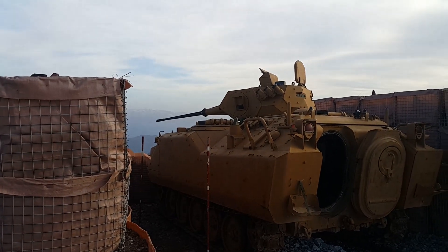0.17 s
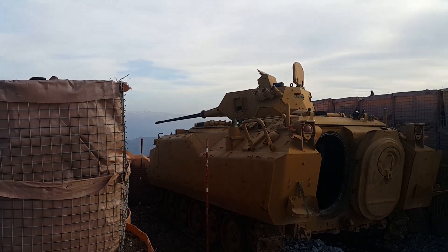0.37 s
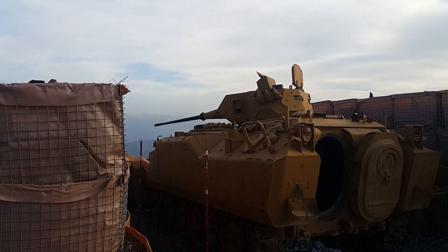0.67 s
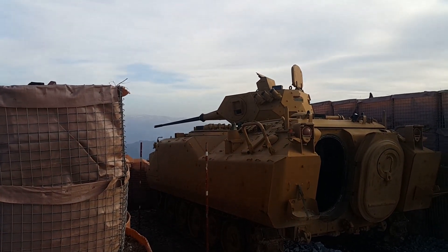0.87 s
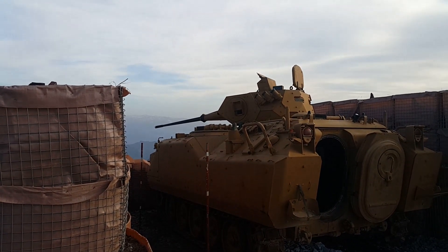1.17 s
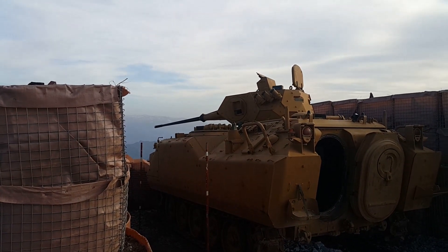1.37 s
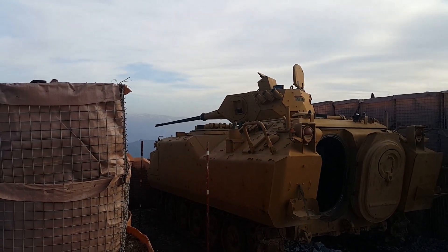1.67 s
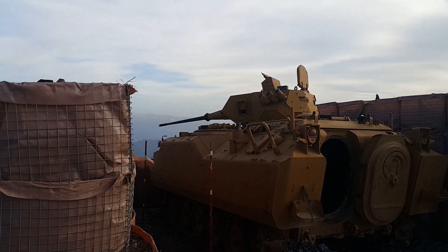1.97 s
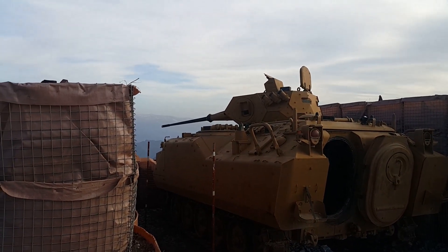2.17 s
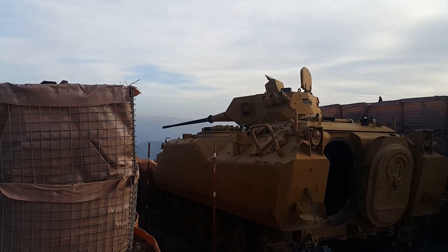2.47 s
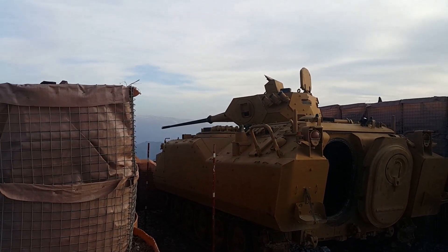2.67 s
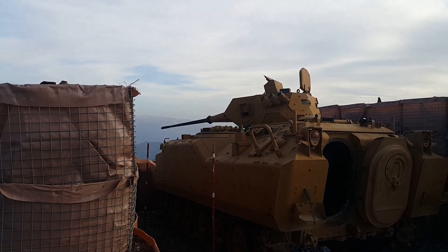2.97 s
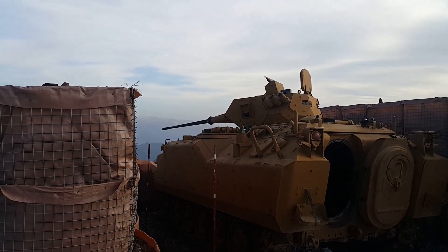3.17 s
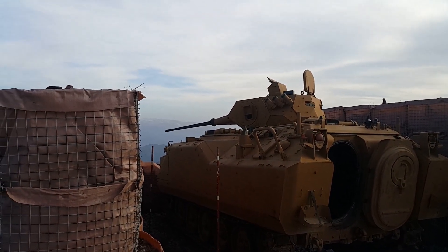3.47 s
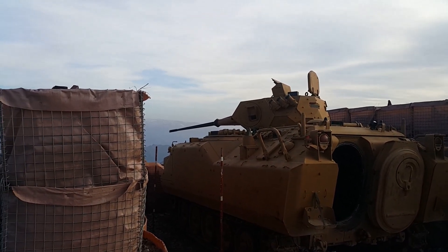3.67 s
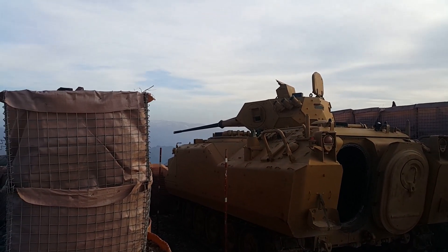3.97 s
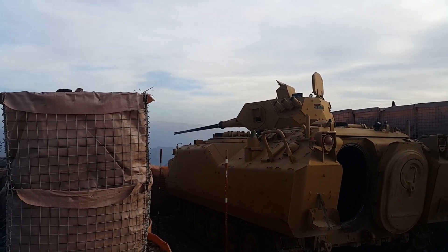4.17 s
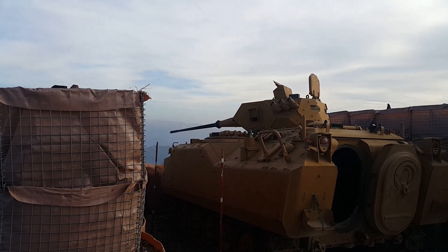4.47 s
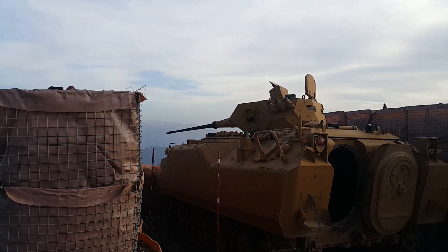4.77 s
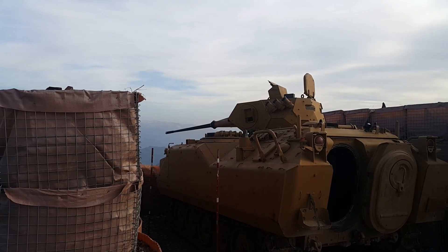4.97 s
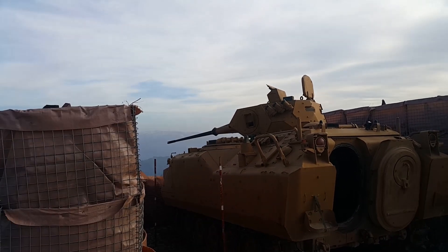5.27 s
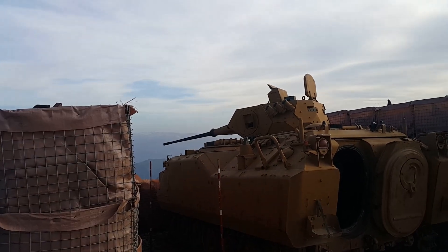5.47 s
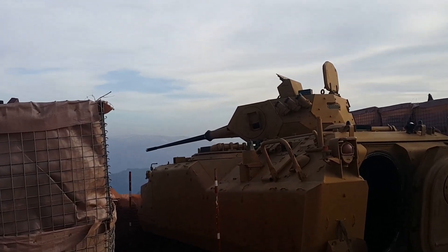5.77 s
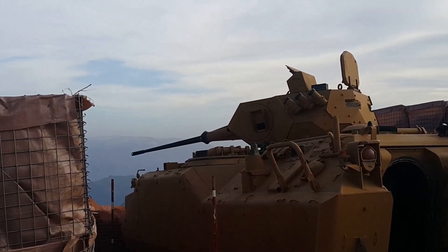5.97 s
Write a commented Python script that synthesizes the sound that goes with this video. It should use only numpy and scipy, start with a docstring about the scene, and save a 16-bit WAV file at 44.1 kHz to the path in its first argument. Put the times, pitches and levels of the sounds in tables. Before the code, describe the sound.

A close stereo handheld microphone picks up a heavy diesel idling evenly, with gear whine, valve clatter and low wind buffets. Its bass thins partway through. A single cannon shot bursts out, clipped and very loud, with rapid echoes from walls and hillside. The background sinks under the tail, the gun mechanism clacks twice, and the full engine returns abruptly.

```python
"""Hilltop: a tracked armoured vehicle idles, its diesel built from shaft tones, whines, clatter and pulsed noise.
Filtered noise makes the wind, with low thumps on the left microphone port, and a faint steady hiss.
The cannon fires once: a hissing lead-in, then bands of decaying noise and pressure pulses that overload
the recorder. Noise bursts give echoes, snaps, rings, rustles and clacks around it.
The background bass thins before the shot, its level sinks around the blast, and both snap back."""
import sys
import numpy as np
from scipy import signal
from scipy.fft import rfft, irfft, next_fast_len
from scipy.io import wavfile
from scipy.ndimage import map_coordinates

SR = 44100
rng = np.random.default_rng(int(sys.argv[2]) if len(sys.argv) > 2 else 0)


def dump_mix(stems):
    """Bounce the given channels to the path in sys.argv[1] as a 16-bit WAV at rate SR."""
    frames = np.atleast_2d(stems).T  # one column per channel
    limited = np.clip(frames, -1, 1)  # hard clip at full scale
    pcm = np.round(limited * 32767).astype(np.int16)
    wavfile.write(sys.argv[1], SR, pcm)


N = 269881


def amp(db):
    """Gain of a level in dB."""
    return 10 ** (np.asarray(db) / 20)


def unit(x):
    """Scale x to rms 1."""
    return x / np.sqrt(np.mean(x ** 2) + 1e-20)


def along(points, hz):
    """Read a curve of (f/Hz, value) points on a log frequency axis."""
    f, value = np.transpose(points)
    return np.interp(np.log(hz + 1), np.log(f + 1), value)


def curves(rows, outside=None):
    """Draw one automation curve, a value per sample, for each column after t/s."""
    s, *columns = np.transpose(rows)
    return [np.interp(np.arange(N) / SR, s, column, outside, outside) for column in columns]


def wobble(rate, step=1):
    """A smooth random curve, rate knots a second, read at every step-th sample."""
    knots = rng.standard_normal(int(N * rate / SR) + 4)
    coarse = np.arange(0, N + 64, 64)
    smooth = map_coordinates(knots, [coarse * rate / SR])
    return np.interp(np.arange(0, N, step), coarse, smooth)


def filtered(x, response):
    """Shape x with a gain that depends on frequency."""
    m = next_fast_len(x.shape[-1] + 8192)
    return irfft(rfft(x, m) * response(np.fft.rfftfreq(m, 1 / SR)), m)[..., :x.shape[-1]]


def coloured_noise(points):
    """Stereo noise of rms 1 with the colour of (f/Hz, level/dB per Hz) points."""
    return unit(filtered(rng.standard_normal((2, N)), lambda f: amp(along(points, f))))


def ports(a, b, alike):
    """Left and right from two unrelated sounds with a given likeness."""
    turn = np.arccos(np.clip(alike, -1, 1)) / 2
    middle, side = np.cos(turn) * a, np.sin(turn) * b
    return np.array([middle + side, middle - side])


def lean(db):
    """Left and right gains in dB for a left minus right difference."""
    return np.array([[db / 2], [-db / 2]])


def burst(size, hz, octaves, alike):
    """Stereo noise of rms 1 in a bell-shaped band."""
    bell = lambda f: np.exp(-(np.log2((f + 1) / hz) / octaves) ** 2)
    return unit(ports(*filtered(rng.standard_normal((2, size)), bell), alike))


def add(out, x, s):
    """Mix x into out from time s."""
    part = out[..., round(s * SR):][..., :x.shape[-1]]
    part += x[..., :part.shape[-1]]


# engine roar through the hull, relative colour: [f/Hz, level/dB per Hz]
HULL_COLOUR = [(18, -61.5), (30, -27.5), (51, -11.5), (101, -8), (140, -2), (208, -10.5), (263, -3),
               (353, -17), (460, -12.5), (532, -20), (683, -17.5), (1000, -26.5), (1300, -58), (2200, -120)]
# strongest shaft tones, mostly on multiples of the six firings a turn: [multiple of shaft speed, peak level/dB]
STRONG_TONES = [(6, -37.5), (9, -41.5), (12, -34.5), (14, -37.5), (15, -38.5), (17, -41), (24, -37),
                (30, -48), (36, -43), (43, -48.5), (45, -46), (60, -49), (65, -47.5)]
SHAFT_HZ, TOP_MULTIPLE = 11.01, 72  # crankshaft turns per s; highest tone
# the other tones: level over the hull colour, random spread, and where they fade out below
WEAK_TONE_DB, WEAK_SCATTER_DB, WEAK_FROM_HZ = -42, 4.5, 140


def tone_levels():
    """Pair each multiple of the shaft speed with a level in dB; weak ones take the colour of the hull."""
    multiples = np.arange(1, TOP_MULTIPLE + 1)
    hz = SHAFT_HZ * multiples
    db = WEAK_TONE_DB + along(HULL_COLOUR, hz) + WEAK_SCATTER_DB * rng.standard_normal(len(hz))
    db -= 10 * np.log10(1 + (WEAK_FROM_HZ / hz) ** 4)
    for multiple, strong_db in STRONG_TONES:
        db[round(multiple) - 1] = strong_db
    return zip(multiples, db)


TONE_STEP = 8  # the shaft tones are low, so every eighth sample carries them


def shaft_tones(turns):
    """Sines locked to the crankshaft, each drifting a little in phase and level."""
    tones = 0
    for multiple, db in tone_levels():
        phase = 2 * np.pi * (multiple * turns[::TONE_STEP] + rng.random((2, 1)))
        phase = phase + 0.33 * wobble(3.026, TONE_STEP)
        tones = tones + amp(db + 1.3 * wobble(5.5, TONE_STEP)) * np.sin(phase)
    return signal.resample_poly(tones, TONE_STEP, 1, axis=1)[:, :N]


# gear and blower whines, before the port colour: [f/Hz, level/dB rms]
WHINES = [(807.5, -57), (958.2, -56.5), (1066, -55.5), (1190, -56), (1389, -53.5), (1497, -66), (1696, -59),
          (2024, -63), (2074, -62.5), (2132, -60.5), (2256, -71.5), (2428, -66), (3975, -80)]


def whines():
    """Steady gear and blower sines, wavering in phase and level."""
    out, t = np.zeros((2, N)), np.arange(N) / SR
    for hz, db in WHINES:
        phase = 2 * np.pi * (hz * t + rng.random((2, 1))) + 0.64 * wobble(6)
        out += np.sqrt(2) * amp(db + 1.7 * wobble(6)) * np.sin(phase)
    return out


def clatter(turns):
    """Valves and pistons strike in the same noise pattern on every turn."""
    pattern = rng.standard_normal((2, 4000))
    place = (turns % 1 * pattern.shape[1]).astype(int)
    return filtered(pattern[:, place], lambda f: f > 780)


# whirr of blower and valve gear, relative colour: [f/Hz, level/dB per Hz]
WHIRR_COLOUR = [(590, -33), (1000, -1.5), (1150, 0), (1310, -3.5), (1340, -10), (1420, -2), (1520, -9),
                (1760, -7.5), (1900, -9.5), (2060, -7.5), (2510, -16.5), (2820, -20.5), (4160, -30),
                (4700, -31.5), (5350, -29.5), (7500, -44.5), (9750, -76.5), (16500, -120)]


def roar_and_whirr(turns):
    """Noise pulsing with the firings, plus clatter, split at 1 kHz into hull roar and valve-gear whirr."""
    # three puffs a turn stand out of the six firings
    third = 3 * 2 * np.pi * turns
    puffs = amp(1.4 * np.cos(third) + 0.35 * np.cos(2 * third) + 0.53 * wobble(12))
    drive = puffs * rng.standard_normal((2, N)) + .6 * clatter(turns)
    roar = unit(filtered(drive, lambda f: amp(along(HULL_COLOUR, f)) * (f < 1000)))
    whirr = unit(filtered(drive, lambda f: amp(along(WHIRR_COLOUR, f)) * (f >= 1000)))
    return amp(-32) * roar + amp(-43.5) * whirr


# likeness of the engine at the two ports: [f/Hz, likeness, clipped to 1]
ENGINE_ALIKE = [(60, 1.3), (180, 0.84), (400, 1.1), (700, 0.57), (1650, .5), (3500, -0.1), (7000, 0.)]
# balance of the engine between the ports: [f/Hz, left minus right level/dB]
ENGINE_LEAN = [(60, 1), (180, 2.5), (550, 4), (1650, -4), (4970, 0), (15000, 1)]


def engine():
    """Tones, whines, roar and whirr of the diesel, spread over the ports by frequency."""
    turns = SHAFT_HZ * np.arange(N) / SR + 0.0039 * wobble(2)  # the governor hunts a little
    sources = roar_and_whirr(turns) + shaft_tones(turns) + whines()
    m = next_fast_len(N)
    hz = np.fft.rfftfreq(m, 1 / SR)
    both = ports(*rfft(sources, m), along(ENGINE_ALIKE, hz))
    both = both * amp(along(ENGINE_LEAN, hz) * [[.5], [-.5]])
    return irfft(both, m)[:, :N]


# wind thumps on the left port: [t/s, level/dB, f/Hz]
THUMPS = [(.33, -20, 109), (0.382, -9.5, 160), (.413, -11, 91.5), (.467, -15.5, 193), (0.837, -7.5, 183),
          (0.859, -10, 144), (0.884, -19.5, 151), (2.26, -22.5, 70), (2.657, -19, 128.3), (3.03, -18, 109),
          (3.529, -13, 111)]
THUMP_CYCLES = 1.6  # length of a thump


def wind():
    """Lumpy low noise, unlike in the two ports, with short low tone pulses thumping the left."""
    # (f/Hz, level/dB per Hz)
    colour = [(15, -36.5), (40, 1.5), (110, 7.0), (250, -2.5), (500, -28.5), (1500, -120)]
    lumps = amp(3 * np.array([wobble(11), wobble(5.4)]))
    rumble = filtered(rng.standard_normal((2, N)), lambda f: amp(along(colour, f)))
    out = amp([[-39], [-46]]) * unit(lumps * rumble)
    t = np.arange(-SR // 20, SR // 20) / SR
    for s, db, hz in THUMPS:
        length = THUMP_CYCLES / hz
        # a slow push of air under each flap of the membrane
        push = amp(-9.5) * np.exp(-(t / length) ** 2) * np.sin(2 * np.pi * 45 * t)
        flap = np.exp(-(2 * t / length) ** 2) * np.cos(2 * np.pi * hz * t)
        add(out[0], amp(db) * (push + flap), s + t[0])
    return out


# microphone self-noise, relative colour: [f/Hz, level/dB per Hz]
HISS_COLOUR = [(5500, -41.5), (6800, -7.5), (7800, -2.5), (9500, -3), (12000, 0), (15600, -0.5)]


def microphone_hiss():
    """Steady treble noise of the microphone itself."""
    return amp(-65.5) * coloured_noise(HISS_COLOUR)


# the background sinks around the blast: [t/s, engine and wind level/dB, hiss level/dB]
SINK = [(4.15, -2.5, -8), (4.23, -2, -13), (4.6, -13.5, -10.5), (4.9, -13.5, -12), (5.169, -13.5, -9)]
THIN_CUT_DB, THIN_CORNER_HZ = -8, 460  # depth and corner of the thin bass
THIN_FROM_S, THIN_TO_S = 2.668, 5.1695


def background():
    """Engine and wind with a stretch of thin bass, plus hiss, all sinking in level around the blast."""
    full = engine() + wind()
    thin = filtered(full, lambda f: amp(THIN_CUT_DB / (1 + (f / THIN_CORNER_HZ) ** 4)))
    t = np.arange(N) / SR
    share = np.clip((t - THIN_FROM_S) / .008, 0, 1) * (t < THIN_TO_S)  # eases in, snaps back
    engine_db, hiss_db = curves(SINK, outside=0)
    return amp(engine_db) * (full + share * (thin - full)) + amp(hiss_db) * microphone_hiss()


# hissing lead-in of the shot: [t/s, level/dB]
LEAD_IN = [(4.02, -63), (4.06, -52), (4.13, -46), (4.148, -31), (4.156, -22.5), (4.168, -15), (4.19, -20.5),
           (4.208, -22), (4.218, -29.5), (4.233, -30), (4.245, -68.5)]
# relative colour of the lead-in: [f/Hz, level/dB per Hz]
LEAD_COLOUR = [(120, -37.5), (200, -11.5), (421, -18.5), (638, -5), (1270, -7), (1610, -6), (3430, -8.5),
               (7000, -16.5), (9100, -42), (15400, -120)]
FIZZ_DB, FIZZ_GROWS = -13, 0.75  # fizz against the hiss at its peak; its dB per dB of the hiss


def lead_in():
    """Coloured noise riding a drawn level, with a fizz above 7 kHz that moves less than the hiss."""
    level_db, = curves(LEAD_IN, outside=-120)
    fizz_db = FIZZ_DB + (FIZZ_GROWS - 1) * (level_db - level_db.max())
    hiss = coloured_noise(LEAD_COLOUR)
    fizz = unit(filtered(rng.standard_normal((2, N)), lambda f: f > 7000))
    return amp(level_db) * (hiss + amp(fizz_db) * fizz)


BLAST_ALIKE, ALIKE_UP_TO_HZ = 0.99, 430  # only the bass is alike at the two ports


def bass_alike(hz):
    """Likeness of the shot's sounds at the two ports, falling with frequency."""
    return BLAST_ALIKE / (1 + (hz / ALIKE_UP_TO_HZ) ** 4)


def knock(db, hz, octaves, shape, pan_db):
    """One short burst of noise that rises, holds and dies; shape is (rise s, hold s, t60 s)."""
    t, (rise, hold, t60) = np.arange(SR // 3) / SR, shape
    fall_db = -60 * np.maximum(t - hold, 0) / t60
    snap = 1 + 0.47 * np.exp(-t / (3 * rise))  # the first contact is the sharpest
    envelope = snap * (1 - np.exp(-t / rise)) * amp(db + fall_db + lean(pan_db))
    return envelope * burst(len(t), hz, octaves, alike=max(.13, bass_alike(hz)))


# sharp snaps: [t/s, level/dB, centre f/Hz, width/octaves, t60/s, left minus right level/dB]
SNAPS = [(4.057, -45.5, 5000, 1.5, .059, -6), (4.3, -30, 9000, 1.2, .012, .5),
         (4.4072, -18.5, 600, 1.8, .049, 8), (4.408, -38, 8000, 1.5, .02, 0.5),
         (4.427, -39, 8000, 1.2, .015, 4.5), (4.468, -31, 3680, 0.7, 0.0058, 8),
         (4.477, -35.5, 5000, 1.1, .009, 3), (4.522, -31.5, 1730, .22, 0.087, 14.5),
         (4.844, -55, 2500, .75, .02, -5), (5.154, -52, 5950, .57, 0.028, -5),
         (5.1686, -47, 5950, 2.2, .004, -2)]
SNAP_RISE_S, SNAP_HOLD_S = .0005, .002


def snaps():
    """Noise bursts with a near-instant rise, each with its own band and decay."""
    out = np.zeros((2, N))
    for s, db, hz, octaves, t60, pan_db in SNAPS:
        add(out, knock(db, hz, octaves, (SNAP_RISE_S, SNAP_HOLD_S, t60), pan_db), s)
    return out


# a small piece of metal rings: [centre t/s, level/dB, f/Hz, length/s]
RINGS = [(4.12, -55, 5000, 0.01), (4.66, -70.5, 6420, 0.01), (4.928, -69, 4990, .015),
         (4.977, -68, 4990, 0.022)]
RING_OCTAVES = .014


def rings():
    """Very narrow noise bands that swell and fade like a faint metal ring."""
    out, t = np.zeros((2, N)), np.arange(SR // 3) / SR
    middle = t[-1] / 2
    for s, db, hz, length in RINGS:
        swell = np.exp(-((t - middle) / length) ** 2)
        add(out, amp(db) * swell * burst(len(t), hz, RING_OCTAVES, alike=.4), s - middle)
    return out


# colour of the blast and its scattered echoes: [f/Hz, blast level/dB, echo level under the blast/dB]
BLAST_BANDS = [(58, -31.5, -20), (127.8, -25.5, -22), (262, -20.5, -13.5), (526, -15.5, -14),
               (940, -19.5, -7.5), (2040, -13, -12), (3680, -17, -8.5), (5890, -14, -14.5),
               (9050, -17, -11), (12580, -12, -15.5)]
# decay of the scattered echoes: [f/Hz, t60/s]
ECHO_T60 = [(150, 0.82), (1000, 1.43), (3500, 0.89), (6000, 0.57), (12500, .42)]
# balance of the blast: [f/Hz, left minus right level/dB]
BLAST_LEAN = [(200, 4.5), (2000, 1.6), (6000, -0.8), (9000, 3)]
SHOT_S = 4.2305
CRACK_RISE_S, BASS_RISE_S, BASS_UP_TO_HZ = 0.0023, 0.031, 611  # the treble cracks at once, the bass swells late
HOLD_S, HOLD_CYCLES, HOLD_MOST_S = 0.017, 15, .16  # lower bands stay at full level longer
BASS_T60, TREBLE_T60, T60_TURN_HZ = 0.46, 0.081, 1500  # first drop, t60 in s


def blast():
    """Bands of noise with their own rise and hold: a fast first drop, then scattered echoes."""
    out, t = np.zeros((2, N)), np.arange(SR) / SR
    horizon_db = -12 / (1 + np.exp((.36 - t) / 0.024))  # the nearer slopes stop answering
    slaps_db = 1.3 * wobble(90)[:SR] * np.minimum(t / 0.077, 1)  # echoes come in lumps
    for hz, db, echo_db in BLAST_BANDS:
        rise = CRACK_RISE_S + BASS_RISE_S / (1 + (hz / BASS_UP_TO_HZ) ** 8)
        late = np.maximum(t - min(HOLD_S + HOLD_CYCLES / hz, HOLD_MOST_S), 0)
        t60 = TREBLE_T60 + (BASS_T60 - TREBLE_T60) / (1 + (hz / T60_TURN_HZ) ** 2)
        first_drop = amp(-60 * late / t60)
        # walls and hillside
        echoes = amp(echo_db + horizon_db - 60 * late / along(ECHO_T60, hz))
        level = amp(db + slaps_db + lean(along(BLAST_LEAN, hz)))
        envelope = (1 - np.exp(-t / rise)) * (first_drop + echoes) * level
        add(out, envelope * burst(SR, hz, octaves=0.64, alike=bass_alike(hz)), SHOT_S)
    return out


# the muzzle's pressure wave and its clearest echo: [t/s, peak level/dB, left minus right level/dB]
SHOCKS = [(4.2332, -3, -0.7), (4.4081, -10, 3)]
SHOCK_S, SHOCK_EDGE_S = .0005, .0001  # length of the push, softness of its front


def shocks():
    """A steep push of air followed by suction."""
    out, t = np.zeros((2, N)), np.arange(SR // 50) / SR
    wave = (1 - t / SHOCK_S) * np.exp(-t / SHOCK_S) * (1 - np.exp(-t / SHOCK_EDGE_S))
    for s, db, pan_db in SHOCKS:
        add(out, amp(db + lean(pan_db)) * wave / wave.max(), s)
    return out


# rounded echoes of the blast: [t/s, level/dB, centre f/Hz, width/octaves, left minus right level/dB]
BOOMS = [(4.265, -20, 197, 0.51, 1), (4.355, -22, 145, 0.57, 3), (4.52, -46, 2080, 1.75, 3),
         (4.41, -28, 250, 0.54, 3), (4.64, -46, 150, .5, 4)]
BOOM_SHAPE = (.006, 0.029, 0.089)  # (rise s, hold s, t60 s)


def booms():
    """Mostly low noise bursts with a soft rise, as rounded echoes of the blast."""
    out = np.zeros((2, N))
    for s, db, hz, octaves, pan_db in BOOMS:
        add(out, knock(db, hz, octaves, BOOM_SHAPE, pan_db), s)
    return out


# soft treble rustles: [t/s, level/dB, centre f/Hz, width/octaves]
RUSTLES = [(4.739, -71, 4470, .6), (4.806, -68, 4290, 0.34), (5.567, -55, 3880, 0.83)]
RUSTLE_SHAPE = (0.0087, .028, 0.18)  # (rise s, hold s, t60 s)


def rustles():
    """Faint treble noise bursts that rise softly."""
    out = np.zeros((2, N))
    for s, db, hz, octaves in RUSTLES:
        add(out, knock(db, hz, octaves, RUSTLE_SHAPE, pan_db=-1), s)
    return out


# the gun's mechanism clacks: [t/s, level/dB]
CLACKS = [(4.884, -39.5), (5.095, -47.5)]
# bands of one clack: [centre f/Hz, width/octaves, level/dB against the clack]
CLACK_BANDS = [(400, 1.5, -3), (1512, 0.78, 1), (5800, 1.02, -5)]
CLACK_SHAPE, CLACK_LEAN_DB = (0.0011, 0.0069, 0.13), -2.5  # (rise s, hold s, t60 s); left minus right


def clacks():
    """The gun's mechanism strikes: low, middle and treble noise bursts together."""
    out = np.zeros((2, N))
    for s, db in CLACKS:
        for hz, octaves, band_db in CLACK_BANDS:
            add(out, knock(db + band_db, hz, octaves, CLACK_SHAPE, CLACK_LEAN_DB), s)
    return out


def scene():
    """Everything at the two microphone ports."""
    shot = lead_in() + blast() + shocks() + booms()
    small_sounds = snaps() + rings() + rustles() + clacks()
    return background() + shot + small_sounds


# microphone colour: [f/Hz, level/dB]
MIC_COLOUR = [(20, -16), (45, -7), (80, -0.5), (6600, 0.), (7400, -7), (9500, -6.5), (12500, -4.5),
              (16000, -6.5)]
TOP_HZ = 15780  # middle of the 200 Hz wide fade at the band limit


def record(dry):
    """Microphone colour, then rounded clipping close to full scale, then the band limit."""
    heard = filtered(dry, lambda f: amp(along(MIC_COLOUR, f)))
    clipped = heard / (1 + np.abs(heard / .97) ** 8) ** (1 / 8)
    return filtered(clipped, lambda f: np.cos(np.pi / 2 * np.clip((f - TOP_HZ) / 200 + .5, 0, 1)) ** 2)


dry = scene()
out = record(dry)
dump_mix(out)
```